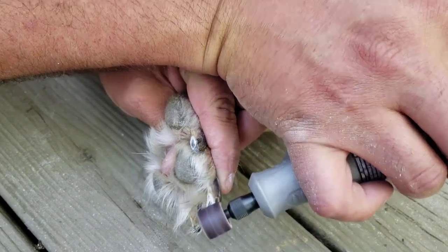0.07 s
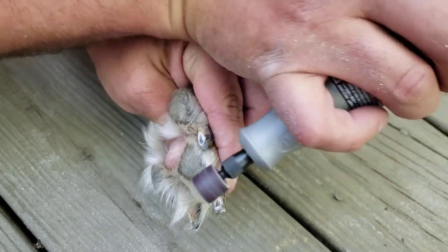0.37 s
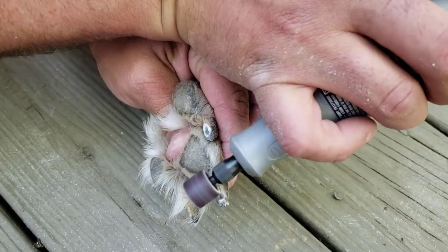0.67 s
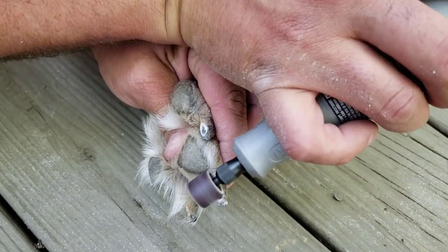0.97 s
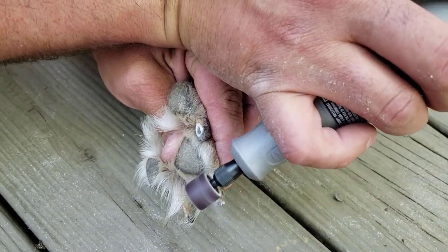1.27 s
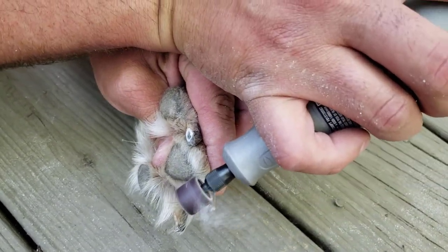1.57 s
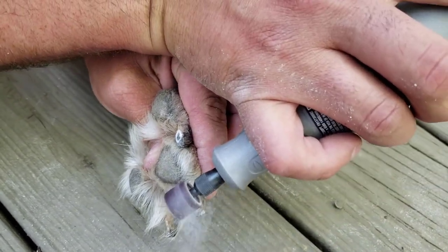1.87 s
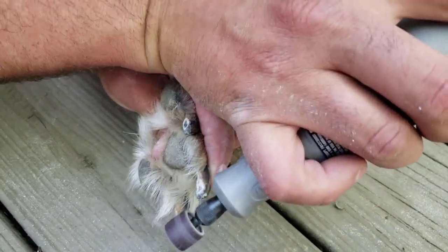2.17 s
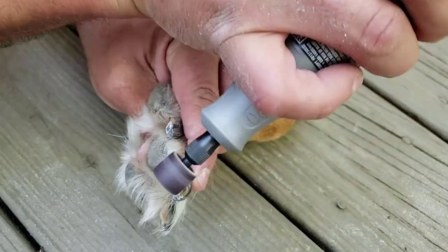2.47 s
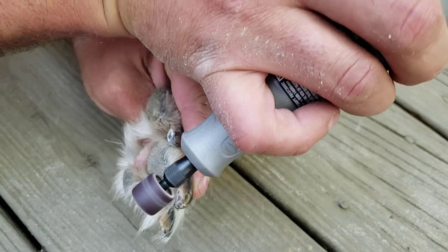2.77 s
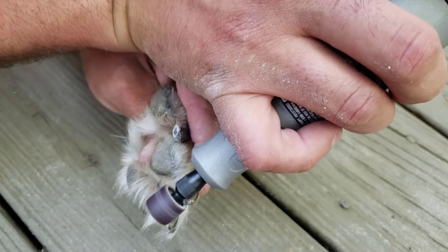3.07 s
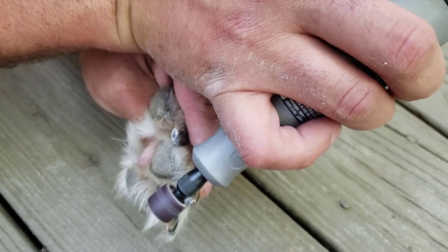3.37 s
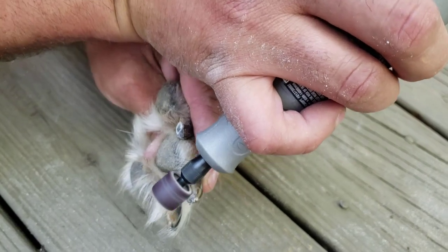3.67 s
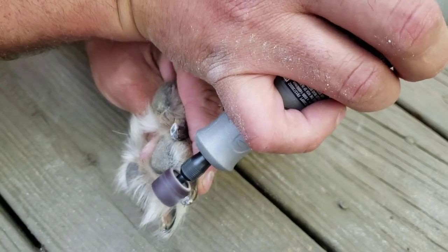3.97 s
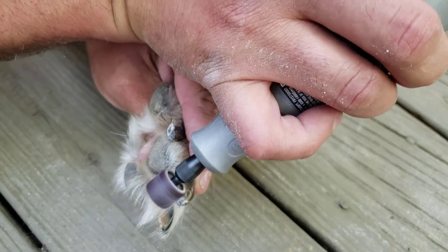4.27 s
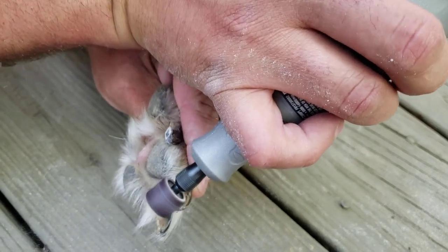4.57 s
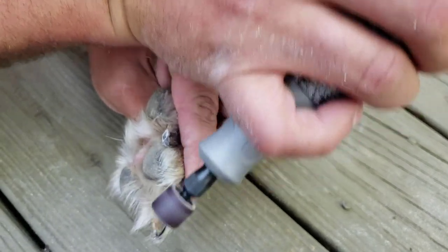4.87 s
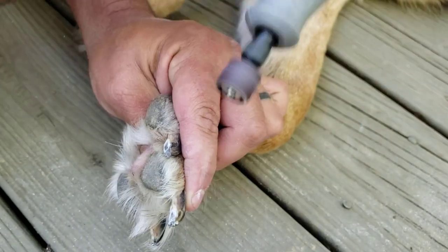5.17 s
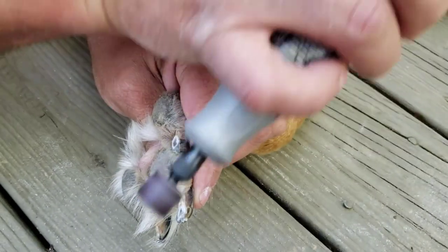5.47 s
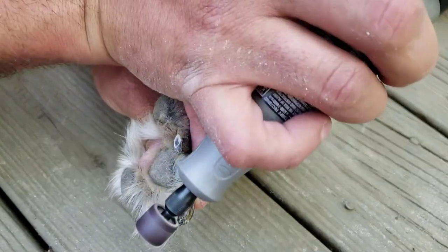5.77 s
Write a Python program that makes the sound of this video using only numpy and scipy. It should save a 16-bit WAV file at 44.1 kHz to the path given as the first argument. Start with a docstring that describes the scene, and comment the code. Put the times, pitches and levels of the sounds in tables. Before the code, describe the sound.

A handheld nail grinder buzzes steadily near the microphone, outdoors, with a low engine hum far away. After a quick scrape, the sanding drum presses into a dog's nail with a gritty, hissing rasp, and the motor slows, then recovers. A light touch and a second heavy grind follow, the nail ringing slightly. The free whine carries on to the end, past a soft thud on the wooden deck.

```python
"""A small battery rotary tool files a dog's nails close by on a wooden deck; a far engine drones throughout.
The drum touches a nail at once, then whines freely at about 105 turns a second. From 0.8 s friction
loads it: it rasps, hisses and slows, and the nail rings, until it skids off and spins up near 2.1 s.
A light contact follows at 3.1 s and a heavy one from 3.6 to 4.7 s. The tool then runs free,
and at 5.3 s, between two faint ticks, something knocks softly on the boards."""
import sys
import numpy as np
from scipy import signal
from scipy.fft import rfft, irfft, next_fast_len
from scipy.io import wavfile
from scipy.ndimage import map_coordinates

SR = 44100
rng = np.random.default_rng(int(sys.argv[2]) if len(sys.argv) > 2 else 0)


def digitize_waveform(pressure):
    """Quantize a signal to 16-bit integers and store it at the path in sys.argv[1].

    Rows of a 2-D input are taken as channels; values are limited to [-1, 1].
    """
    field = np.atleast_2d(pressure).T
    bounded = np.clip(field, -1, 1)
    quanta = np.round(bounded * 32767).astype(np.int16)
    wavfile.write(sys.argv[1], SR, quanta)


N = 265041

# Levels are relative. Spectra give density, and only their shape matters.
# unloaded shaft speed: t/s, f/Hz
IDLE_SPEED = [(0, 105.3), (3, 105.6), (6, 105.05)]
# speed lost to friction, one curve per press of the hand: t/s, drag/Hz
PRESS_DRAG = [
    [(0, 13), (.07, 10), (.15, 0)],
    [(.825, 0), (.86, 21.5), (.95, 21), (1.08, 23), (1.16, 27.5), (1.27, 26.5), (1.31, 31), (1.4, 31.5),
     (1.52, 42.5), (1.68, 38), (1.84, 40.5), (1.89, 44.5), (2.02, 37), (2.1, 0)],
    [(3.09, 0), (3.12, 6.5), (3.22, 10), (3.35, 11.5), (3.43, 8.5), (3.51, 2), (3.57, 3)],
    [(3.57, 9), (3.61, 11), (3.69, 5), (3.74, 27), (3.82, 23), (3.89, 28), (3.97, 26), (4.16, 38.5),
     (4.29, 33.5), (4.36, 36.5), (4.45, 43), (4.61, 35), (4.68, -0.5)],
]
# shaft harmonics at idle, which also trace the housing's resonances: order, level/dB
WHINE_ORDERS = [(1, -31), (2, -18), (3, -33), (4, -25.5), (6, -19.5), (7, -26), (8, -10), (9, -9),
                (10, -7.5), (11, -13.5), (12, 1.5), (13, -4), (14, -5), (15, -3.5), (16, -22.5),
                (17, -11.5), (19, -27.5), (21, -24), (22, -16.5), (23, -20), (24, -22), (25, -14),
                (26, -13), (27, -31)]
# thin high harmonics: order, level/dB re the whine
HIGH_ORDERS = [(42, -15), (46, -26), (69, -23.5), (89, -24), (101, -40)]
# gains as the hand turns the tool: t/s, whine/dB, rattle/dB, brush hiss/dB
FACING_GAINS = [(.2, -2, 0.5, 0.7), (.75, -0.7, 0, .8), (2.25, 1, .5, -1.5), (2.6, 0.9, 0.9, 1.4),
                (3.05, 1.5, 0.7, 0.7), (4.8, 1, -1, -1.5), (5.05, -0.5, -0.5, -0.2), (5.3, -2, -2.5, -3.5),
                (5.5, -.8, 1, -0.5), (5.7, 1, 1, 1.7), (6, 0.5, -0.7, -1)]
# bearing tick, bearing rattle and brush hiss: f/Hz, level/dB
TICK_SPECTRUM = [(1200, -30), (2200, -1), (2700, 2), (3400, -2), (4500, -1), (5300, -14), (8000, -30)]
RATTLE_SPECTRUM = [(350, -65), (600, -22.5), (786, -16.5), (857, -14.5), (891, -13), (917, -13.5),
                   (1070, -18.5), (1100, -12.5), (1280, -6.5), (1590, -5.5), (1670, -9.5), (2000, -11.5),
                   (2350, -6), (2800, -8), (3640, -10), (4370, -4.8), (6000, -24), (7800, -63),
                   (13200, -120)]
BRUSH_SPECTRUM = [(3530, -35), (6000, -11.5), (6840, -8), (7190, -3.5), (8570, -12), (9660, -1.5),
                  (11600, 4), (14300, -4.5), (15400, -14), (16000, -7.5)]
# the rattle flutters while the tool hangs free: start/s, end/s, depth/dB
RATTLE_FLUTTERS = [(.15, 0.79, 0.7), (4.954, 6.05, 0.5)]
# engine crank speed: t/s, f/Hz
CRANK_SPEED = [(0, 38.82), (2.3, 38.46), (3.4, 37.94), (6, 37.84)]
# loud engine orders: t/s, second/dB, third/dB, fourth/dB
LOUD_ORDERS = [(0.2, -49, -50.1, -39.0), (1.2, -53, -55, -41.5), (2.0, -55, -63.6, -45.5),
               (2.5, -51.5, -66, -44.5), (3.5, -51.5, -61, -45), (3.9, -48, -53, -47),
               (4.4, -45, -51.5, -46.5), (5.2, -49.5, -52, -46), (5.9, -48.5, -55, -48)]
# weak, steady engine orders: order, level/dB
STEADY_ORDERS = [(1.5, -71), (2.5, -73), (3.5, -91), (4.5, -59.5), (5, -68), (6, -55.5)]
# outdoor rumble: f/Hz, level/dB
RUMBLE_SPECTRUM = [(12, -55), (20, -24), (54, -2.5), (108, -9.5), (146, -3), (193, -4.5), (240, -11.5),
                   (289, -17.5), (519, -19), (764, -18.5), (800, -34), (1040, -56), (1760, -120)]
# drum strokes, one list per contact: start/s, end/s, rasp/dB, bite/dB, hiss/dB, thrum/dB
DRUM_STROKES = [
    [(-.025, 0.095, -33.5, -40, -29, -72), (.075, 0.176, -43.5, -46.5, -38.5, -51.5)],
    [(.8, .885, -41.5, -44, -36.5, -58), (.86, 1.075, -40.5, -40, -30.5, -47.5),
     (1.05, 1.34, -38.5, -40, -29.5, -51), (1.315, 2.015, -40, -42.5, -30.5, -47.5),
     (1.99, 2.06, -33.5, -34, -26.5, -46), (2.035, 2.115, -31.5, -40.5, -25.5, -50),
     (2.09, 2.165, -44.5, -50, -33, -57)],
    [(3.12, 3.235, -40.5, -44, -34.5, -59), (3.21, 3.52, -47, -50, -37.5, -58.5),
     (3.285, 3.355, -53, -61, -56, -72), (3.395, 3.475, -44, -47.5, -60, -66),
     (3.495, 3.6, -52, -57, -47, -66), (3.578, 3.67, -34.5, -43.5, -30, -57),
     (3.645, 3.745, -38.5, -41.5, -36, -56), (3.72, 3.825, -35.5, -36, -29.5, -49.5),
     (3.8, 4.29, -38, -36.5, -31.5, -48.5), (4.265, 4.355, -39.5, -38.5, -32.5, -52),
     (4.33, 4.54, -37, -38.5, -28.5, -49), (4.515, 4.625, -33.5, -34, -27, -50),
     (4.6, 4.705, -28.5, -32, -25.5, -46.5)],
]
# midrange bite and treble rasp, one spectrum per contact: f/Hz, level/dB
BITE_SPECTRA = [
    [(260, -40), (450, -23), (718, -9), (861, -10), (912, -24), (1260, -5), (3200, -6.5), (4160, -30),
     (7040, -120)],
    [(620, -32), (1050, -11), (1380, 2), (1660, -1), (1790, -12), (1960, 2), (2120, -5), (2290, 0.5),
     (2490, -4.5), (2820, 1), (3200, -21), (4160, -39), (7040, -120)],
    [(620, -49), (1050, -18), (1160, -5.5), (1270, -8), (1400, 1.5), (1930, -6), (2060, -10.5), (2280, 3),
     (2510, -5), (2760, 3), (3200, -14.5), (4160, -36), (7040, -120)],
]
RASP_SPECTRA = [
    [(1760, -24.5), (3000, -16), (5140, 0.5), (6290, -16), (6520, -14), (9000, -29), (11700, -54),
     (19800, -120)],
    [(1760, -35), (3000, -5.5), (3260, -3), (4060, 1), (5430, 1), (6010, -11), (7350, -7), (8170, -15),
     (9000, -17), (11700, -28), (19800, -120)],
    [(1760, -35), (3000, -6), (3110, -12.5), (3400, 4.5), (3790, -4), (4140, -1.5), (5350, -1.5),
     (5790, -10), (6860, -15), (9000, -17), (11700, -48), (19800, -120)],
]
# grit hiss, toe response and pressed nail's resonance: f/Hz, level/dB
GRIT_SPECTRUM = [(5000, -33), (8500, -17), (10400, -8.5), (12100, 0.5), (13200, -4), (15000, -4),
                 (16000, -3.5)]
TOE_SPECTRUM = [(220, -28), (380, -17), (408, -16.5), (612, -12), (741, 2), (936, -11), (1050, -8),
                (1360, -13), (2310, -120)]
NAIL_SPECTRUM = [(1000, -40.5), (1250, -18), (1390, 2), (1520, -17.5), (1800, -29.5)]
# a slower drum cuts less: slope/(dB/Hz) for rasp, bite, hiss and thrum
CUT_SLOPES = [0.18, 0.092, 0.14, 0.28]
# sharp snaps as the drum meets the nail, and two faint ticks while the tool runs free: t/s, level/dB
SNAPS_AND_TICKS = [(0.0578, -14.5), (0.068, -18), (0.0782, -28), (2.035, -23), (2.0688, -19), (2.1184, -23),
                   (2.1405, -29), (3.0981, -16), (3.1026, -19), (3.1094, -15), (3.5885, -18), (5.005, -37),
                   (5.785, -34)]
# colour of a snap, faint tick or tap: f/Hz, level/dB
SNAP_SPECTRUM = [(600, -8.5), (2000, -6.5), (3500, 12), (5500, 6), (8000, -13), (13000, 2.5), (16000, -13)]
# the drum barely touches: start/s, end/s, level/dB
LIGHT_TOUCHES = [(.1, .18, -29), (2.09, 2.16, -30), (3.57, 3.66, -29)]
# the drum bites steadily: start/s, end/s, toe/dB, nail/dB
STEADY_BITES = [(.86, 1.04, -46, -62), (1.01, 1.34, -49, -46.5), (1.31, 1.52, -65, -66),
                (1.75, 1.95, -51.5, -55), (3.64, 3.94, -53, -50), (3.91, 4.16, -71, -53)]
# the nail sings while the drum holds a spot: start/s, end/s, f/Hz, level/dB
NAIL_NOTES = [(1.516, 1.646, 2810, -45), (3.13, 3.23, 5350, -49), (3.133, 3.234, 2790, -42),
              (3.23, 3.49, 2880, -48.5), (3.59, 3.74, 3450, -44), (3.725, 3.832, 1385, -42),
              (3.86, 3.996, 2250, -45), (4.14, 4.305, 2750, -42.5), (4.504, 4.612, 1456, -44),
              (4.581, 4.672, 2277, -32)]
# whistles as the load comes off: start/s, end/s, order, level/dB
SPIN_UP_WHISTLES = [(2, 2.42, 33, -57.5), (4.73, 4.98, 33, -54), (4.72, 5.02, 42, -53.5)]
# the drum skids off the nail's rim: start/s, end/s, level/dB
RIM_SKIDS = [(2.015, 2.11, -31), (2.085, 2.16, -38.5), (3.13, 3.22, -39), (4.615, 4.705, -33)]
# scrape of a skid: f/Hz, level/dB
SKID_SPECTRUM = [(1500, -44), (3500, -37), (5500, 20.5), (6800, 18), (8500, 9.5), (12000, 13.5),
                 (16000, -28)]
# knock on the deck: t/s, level/dB
DECK_KNOCKS = [(5.302, -37)]
# response of the boards: f/Hz, level/dB
BOARD_SPECTRUM = [(120, -12), (300, 0), (700, 0), (900, -5), (1600, -28)]
# likeness of the two channels: f/Hz, correlation (clipped to 1 in use)
CORRELATION = [(200, .99), (750, 0.8), (1400, 0.35), (1900, 0.2), (2300, 0.7), (2800, 0.47), (3200, 0.78),
               (4200, .42), (5400, 0.5), (6200, 0.4), (7300, 1.1), (8300, -0.3), (11700, 0.5), (15000, 1.2)]
# lead of left over right: f/Hz, phase/rad
PHASE_LEAD = [(200, -0.5), (1300, 0.13), (1700, 0.5), (1900, 2), (2200, 0.6), (2800, 0.4), (3400, 1.8),
              (4100, 0.4), (4800, -2.5), (5600, -2.4), (7000, -1.73), (15000, -1.85)]
# left minus right, from the tool and from the nail: f/Hz, level/dB
TOOL_BALANCE = [(200, 39), (700, 21.5), (1300, 10.5), (2400, 10), (3400, 5.5), (4800, -11.5), (5600, -9.5),
                (7300, 16), (10400, -2), (12500, -0.5), (15000, 18)]
NAIL_BALANCE = [(700, -2), (1300, 2.5), (2400, 6.5), (3400, -1), (4400, 0.5), (5300, -5.5), (6500, -3),
                (7800, 6), (10500, -0.5), (12000, 5.5), (14000, 18.5)]

FREE_HZ, WORKING_HZ = 105.1, 82  # reference shaft speeds, free and cutting
ATTACK_S, RELEASE_S = 0.022, 0.028  # the drum settles on the nail and lifts off
TIME = np.arange(N) / SR
FFT_SIZE = next_fast_len(N + 8192)
FREQS = np.fft.rfftfreq(FFT_SIZE, 1 / SR)


def amp(db):
    return 10 ** (np.asarray(db) / 20)


def unit(x):
    """Normalisation: the mean of the channels gets rms 1."""
    return x / np.sqrt(np.mean(np.atleast_2d(x).mean(0) ** 2) + 1e-20)


def along(points, hz):
    """Interpolation on a logarithmic frequency axis."""
    f, values = np.transpose(points)
    return np.interp(np.log(hz + 1), np.log(f + 1), values)


def curves(rows):
    """Linear interpolation in time, one curve per value column."""
    times, *columns = np.transpose(rows)
    return np.array([np.interp(TIME, times, column) for column in columns])


def wobble(rate):
    """Smooth random modulation, with rate knots a second."""
    return map_coordinates(rng.standard_normal(int(N * rate / SR) + 4), [TIME * rate])


def white():
    """Two uncorrelated white noises."""
    return rng.standard_normal((2, N))


def filtered(x, response):
    """Linear filtering by a gain at each of FREQS."""
    return irfft(rfft(x, FFT_SIZE) * response, FFT_SIZE)[..., :N]


def radiated(pair, spectrum, balance=NAIL_BALANCE):
    """Partial coherence: two excitations are coloured and mixed into left and right, at rms 1."""
    angle = np.arccos(np.clip(along(CORRELATION, FREQS), -1, 1)) / 2
    mid, side = rfft(pair, FFT_SIZE) * amp(along(spectrum, FREQS)) * [np.cos(angle), np.sin(angle)]
    lean = amp(along(balance, FREQS) / 2) * np.exp(.5j * along(PHASE_LEAD, FREQS))
    return unit(irfft(np.array([(mid + side) * lean, (mid - side) / lean]), FFT_SIZE)[:, :N])


def gate(start, end, attack=ATTACK_S, release=RELEASE_S):
    """Trapezoidal envelope: attack, hold and release."""
    return np.clip((TIME - start) / attack, 0, 1) * np.clip((end - TIME) / release, 0, 1)


def envelopes(rows, attack=ATTACK_S):
    """Summed gates, one gain curve per level column."""
    return sum(np.outer(amp(levels), gate(start, end, attack)) for start, end, *levels in rows)


def decays(events, t60):
    """Exponential decay after each onset, by 60 dB in t60 seconds."""
    return sum(amp(db - 60 * np.abs(TIME - start) / t60) * (TIME >= start) for start, db in events)


def surface(turns, memory, bumps_per_turn=420):
    """Quasi-periodic roughness: memory is the correlation of each turn with the one before."""
    keep = min(memory, .995)
    bumps = rng.standard_normal((2, 700, bumps_per_turn))
    bumps[:, 1:] *= np.sqrt(1 - keep ** 2)
    track = signal.lfilter([1], [1, -keep], bumps, axis=1).reshape(2, -1)
    return np.array([map_coordinates(row, [turns * bumps_per_turn]) for row in track])


def kicks(turns, jitter_turns, scatter_db):
    """Impulse train: one kick a turn, uneven in time and size."""
    whole = np.arange(1, int(turns[-1]))
    late, size = rng.standard_normal((len(whole), 2)).T
    onsets = np.searchsorted(turns, whole + jitter_turns * late).clip(0, N - 1)
    train = unit(np.bincount(onsets, amp(scatter_db * size), N))
    return np.array([train, np.roll(train, shift=9)])


def lagged(x, tau_s, initial):
    """First-order relaxation towards x."""
    keep = np.exp(-1 / (tau_s * SR))
    return signal.lfilter([1 - keep], [1, -keep], x, zi=[initial])[0]


def shaft_speed(inertia_s=.04, battery_s=.5, battery_share=.04):
    """Friction lowers the speed in Hz; inertia delays the change, and a small part relaxes slowly."""
    drag = sum(np.interp(TIME, *np.transpose(press), left=0, right=0) for press in PRESS_DRAG)
    quick, slow = lagged(drag, inertia_s, drag[0]), lagged(drag, battery_s, 0)
    return curves(IDLE_SPEED)[0] - (1 - battery_share) * quick - battery_share * slow


def whine(turns, speed, max_lift_db=3.5):
    """Forced vibration: shaft harmonics slide through the fixed resonances of the housing."""
    pace = speed / FREE_HZ
    shaky = turns + 0.0032 * wobble(45)
    tone = lambda k: np.sqrt(2) * np.sin(2 * np.pi * (k * shaky + rng.random())) * amp(.84 * wobble(9.7))
    housing_db = lambda k: np.interp(k * pace, *np.transpose(WHINE_ORDERS))
    body = unit(sum(amp(np.minimum(housing_db(k), db + max_lift_db)) * tone(k) for k, db in WHINE_ORDERS))
    overtones = sum(amp(db) * tone(k) for k, db in HIGH_ORDERS)
    return amp(-31 * (1 - pace)) * (body + overtones) * amp([[1.5], [-1.5]])


def bearing(turns, flutter_hz=8.66):
    """Periodic impact: the bearing ticks and its rattle surges once a turn."""
    tick = radiated(kicks(turns, jitter_turns=0.0056, scatter_db=0.5), TICK_SPECTRUM, TOOL_BALANCE)
    slap = 0.6 + np.exp(-(turns % 1) / 0.056)
    roughness = surface(turns, memory=0.94) + 1.02 * white()
    rattle = radiated(slap * roughness, RATTLE_SPECTRUM, TOOL_BALANCE)
    depth_db = sum(db * gate(start, end) for start, end, db in RATTLE_FLUTTERS)
    flutter = np.sin(2 * np.pi * flutter_hz * TIME + .5 * wobble(2.16))
    return amp(depth_db * flutter) * (0.37 * tick + 0.88 * rattle)


def brushes(turns, spark_depth=0.11):
    """Amplitude modulation: the hissing brushes spark twice a turn."""
    sparking = 1 + spark_depth * np.cos(4 * np.pi * turns)
    roughness = surface(turns, memory=.995) + 0.89 * white()
    return radiated(sparking * roughness, BRUSH_SPECTRUM, TOOL_BALANCE)


def shifting_treble(x, depth_db=2, rate_hz=2.474, width_hz=448):
    """Spectral modulation: random patches of treble swell and fade as the tool moves."""
    hz, t, spectra = signal.stft(x, SR, nperseg=512)
    grid = np.meshgrid(hz / width_hz, t * rate_hz, indexing="ij")
    patches = map_coordinates(rng.standard_normal((120, 60)), grid, mode="mirror")
    treble = np.clip(hz / 4000, 0, 1)[:, None]
    return signal.istft(spectra * amp(depth_db * treble * patches), nperseg=512)[1][:, :N]


def motor(turns, speed):
    """Directivity: whine, rattle and hiss change level as the hand turns the tool."""
    whine_db, rattle_db, brush_db = curves(FACING_GAINS)
    tones = amp(whine_db - 46.5) * whine(turns, speed)
    noise = amp(rattle_db - 47) * bearing(turns) + amp(brush_db - 51.5) * brushes(turns)
    return tones + shifting_treble(noise)


def engine(lead_rad=0.089):
    """Periodic exhaust: only the low orders of the crank carry from afar."""
    crank = np.cumsum(curves(CRANK_SPEED)[0]) / SR

    def tone(order):
        phase = 2 * np.pi * (order * crank + rng.random()) + [[lead_rad], [-lead_rad]]
        return np.sqrt(2) * np.sin(phase) * amp(.6 * wobble(6))
    loud = sum(amp(db) * tone(k) for k, db in enumerate(curves(LOUD_ORDERS), 2))
    steady = sum(amp(db) * tone(k) for k, db in STEADY_ORDERS)
    return (loud + steady) * amp([[.4], [-.4]])


def outdoor_rumble():
    """Ambient noise whose coherence between the channels falls with frequency."""
    colour = amp(along(RUMBLE_SPECTRUM, FREQS))
    return unit(filtered(white()[0], colour) + filtered(white(), colour * FREQS / 500))


def grinding(turns, speed, high_spot_db=3.5, high_spot_turns=.25):
    """Abrasion: grit excites nail and toe; the drum runs out of true and digs in once a turn."""
    press_db = 0.38 * np.cos(2 * np.pi * turns) + 0.33 * wobble(160) + 0.56 * wobble(25.28)
    grains = lambda spiky_db: amp(press_db + spiky_db * wobble(2500))
    chatter = kicks(turns, jitter_turns=0.006, scatter_db=6.0)
    toe = radiated(0.51 * chatter + surface(turns, memory=0.61), TOE_SPECTRUM)
    dig = amp(high_spot_db * np.exp(-(turns % 1) / high_spot_turns))
    # coarse bumps recur from turn to turn more than fine grit does
    coarse = 0.15 * chatter + dig * surface(turns, memory=0.66) * grains(spiky_db=3.0)
    fine = dig * surface(turns, memory=0.33) * grains(spiky_db=2.0)
    grit = radiated(white() * grains(spiky_db=2.5), GRIT_SPECTRUM)
    # each kick rings the nail, so a pitched groan sinks with the shaft
    groan = amp(-16) * radiated(chatter + .5 * surface(turns, memory=0.4), NAIL_SPECTRUM)
    hand_tremor_db = .5 * wobble(14)
    cutting = amp(np.outer(CUT_SLOPES, speed - WORKING_HZ) + hand_tremor_db)
    sound = np.zeros((2, N))
    for strokes, bite_spectrum, rasp_spectrum in zip(DRUM_STROKES, BITE_SPECTRA, RASP_SPECTRA):
        rasp, bite, hiss, thrum = cutting * envelopes(strokes)
        sound += bite * (radiated(coarse, bite_spectrum) + groan)
        sound += rasp * radiated(fine, rasp_spectrum) + hiss * grit + thrum * toe
    return sound


def snaps_and_ticks():
    """Damped transients: sharp snaps as the drum meets the nail, two faint ticks while it runs free."""
    return amp(-7.5) * decays(SNAPS_AND_TICKS, t60=0.024) * radiated(white(), SNAP_SPECTRUM)


def grazing(turns, tap_turns=0.1):
    """Intermittent contact: only the drum's high spot taps the nail, once a turn."""
    taps = np.exp(-(turns % 1) / tap_turns)
    return envelopes(LIGHT_TOUCHES) * taps * radiated(white(), SNAP_SPECTRUM)


def growl(turns, speed):
    """Source and filter: the loaded shaft's harmonics sink through the resonances of toe and nail."""
    orders = np.arange(6, 25)
    shaky = turns + 0.0059 * wobble(60)
    tones = np.array([np.sin(2 * np.pi * (k * shaky + rng.random())) for k in orders])

    def through(body):
        gains = amp(along(body, np.outer(orders, speed)))
        return (gains * tones).sum(0) / np.sqrt((gains ** 2).sum(0) / 2)
    toe, nail = envelopes(STEADY_BITES)
    return (toe * through(TOE_SPECTRUM) + nail * through(NAIL_SPECTRUM)) * amp([[1], [-1]])


def singing(turns, skirt=0.26):
    """Resonance: the grit keeps one narrow mode of the nail ringing for a moment."""
    grit = surface(turns, memory=0.54)
    peak = lambda hz: [(hz * (1 - skirt), -80), (hz, 0), (hz * (1 + skirt), -80)]
    return sum(amp(db) * gate(start, end) * radiated(grit, peak(hz)) for start, end, hz, db in NAIL_NOTES)


def whistle(turns):
    """Phase locking: thin high harmonics rise with the shaft as it regains speed."""
    tone = lambda k: np.sqrt(2) * np.sin(2 * np.pi * k * turns) * amp(wobble(25.7))
    return sum(amp(db) * gate(start, end, attack=0.073, release=0.11) * tone(k)
               for start, end, k, db in SPIN_UP_WHISTLES)


def skids():
    """Sliding friction: the drum leaves the nail's rim in a broad, spiky scrape."""
    spiky = white() * amp(2.4 * wobble(700))
    return envelopes(RIM_SKIDS, attack=0.044) * radiated(spiky, SKID_SPECTRUM)


def knock():
    """Damped vibration: the boards thud under a soft blow."""
    return amp(-3) * decays(DECK_KNOCKS, t60=.032) * radiated(white(), BOARD_SPECTRUM)


def scene():
    """Superposition: one shaft times the tool's tones and pulses; the engine runs on its own."""
    speed = shaft_speed()
    turns = np.cumsum(speed) / SR
    sound = motor(turns, speed) + engine() + amp(-55.5) * outdoor_rumble()
    sound += grinding(turns, speed) + snaps_and_ticks() + grazing(turns) + growl(turns, speed)
    return sound + singing(turns) + whistle(turns) + skids() + knock()


def record(dry):
    """Band limiting: an ideal low-pass filter removes the highest treble."""
    cutoff_hz = 15850
    return filtered(dry, FREQS < cutoff_hz)


dry = scene()
out = record(dry)
digitize_waveform(out)
```